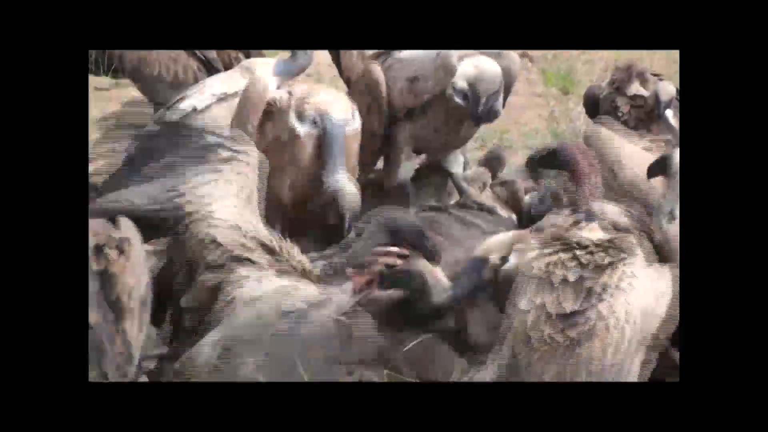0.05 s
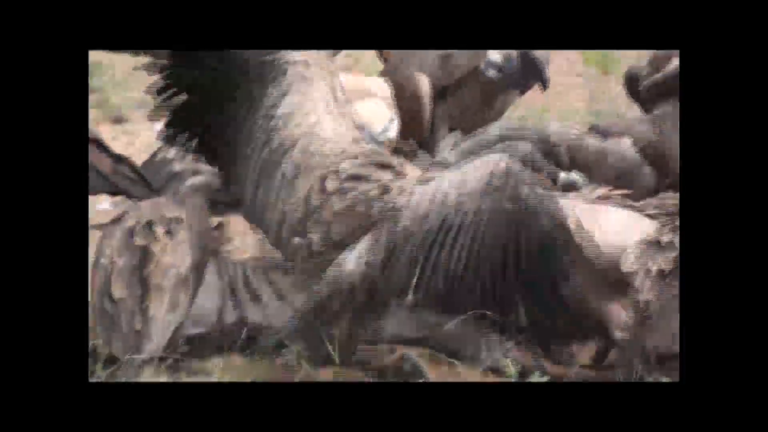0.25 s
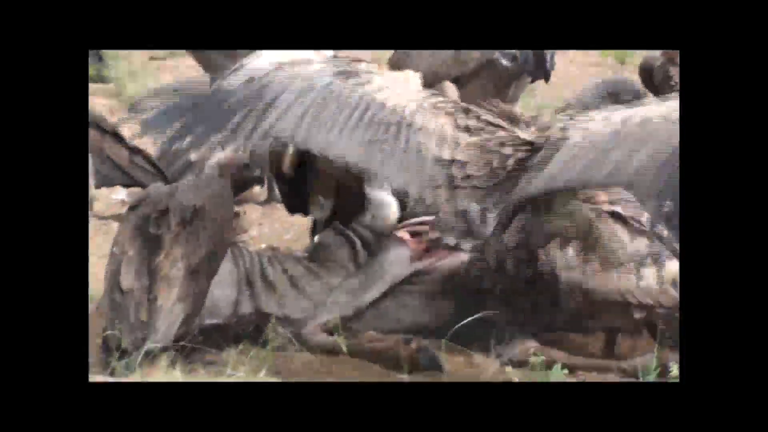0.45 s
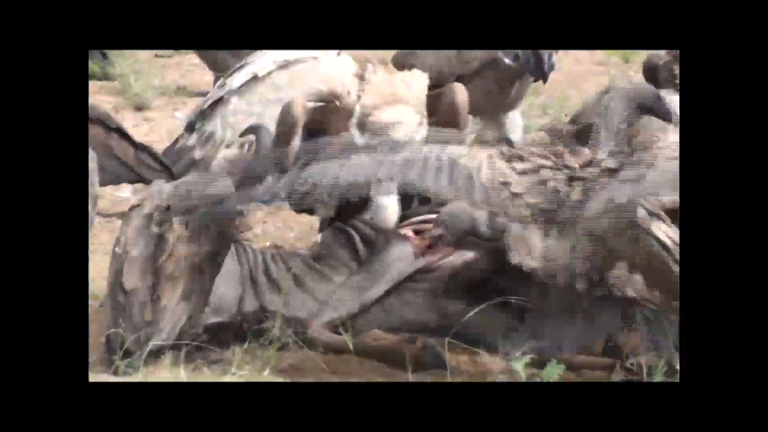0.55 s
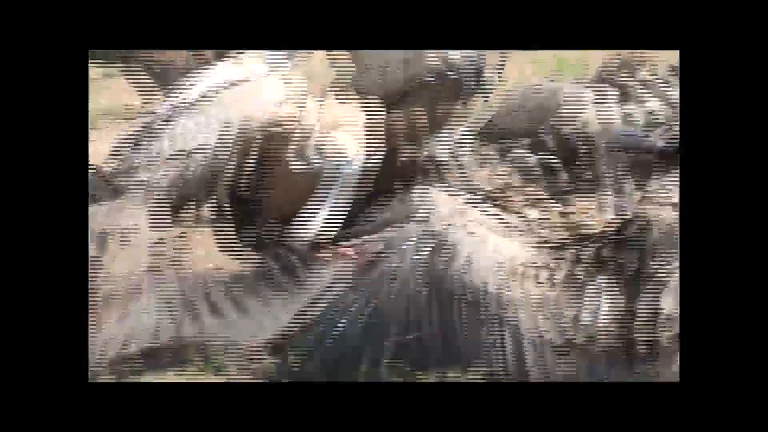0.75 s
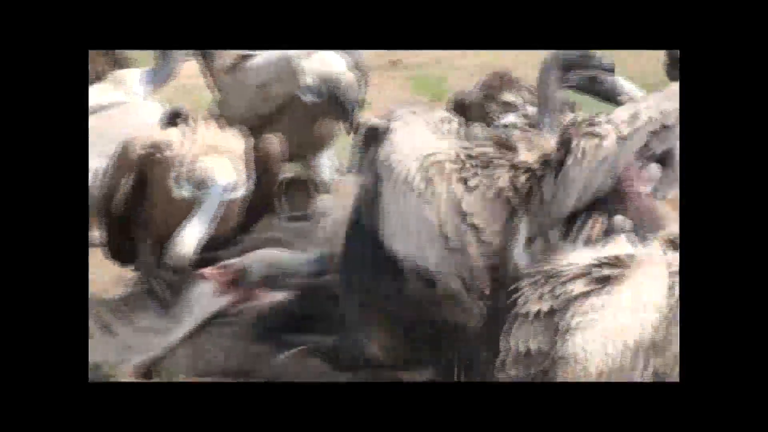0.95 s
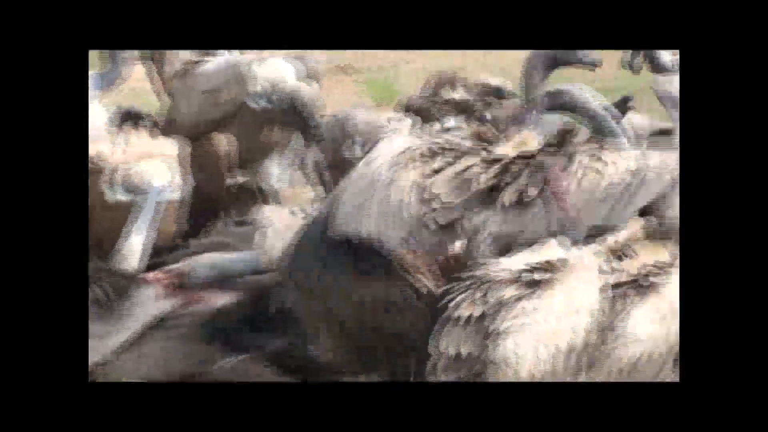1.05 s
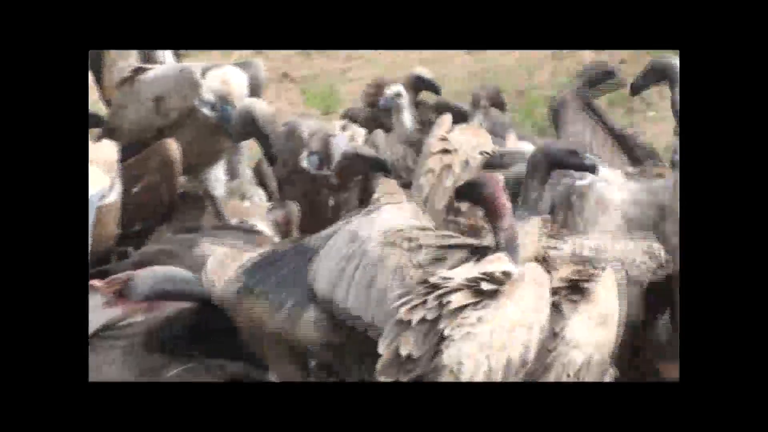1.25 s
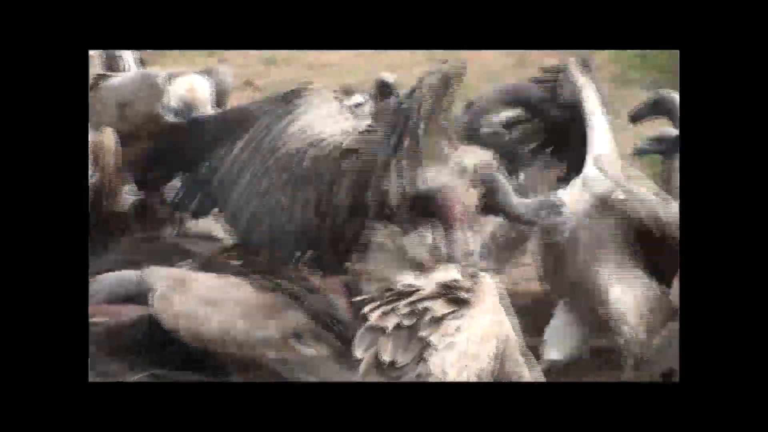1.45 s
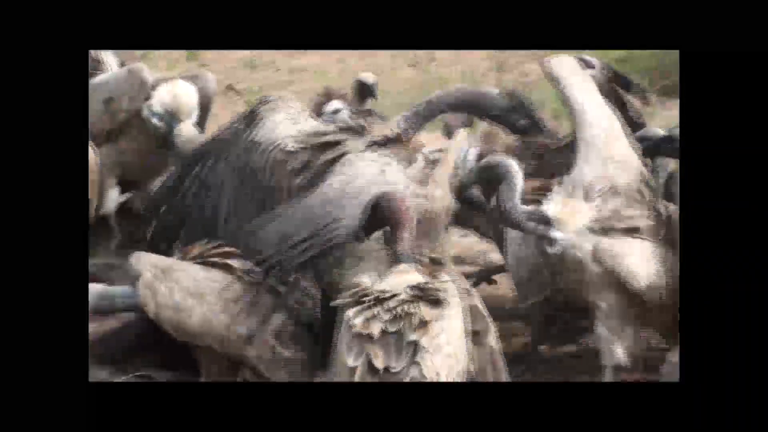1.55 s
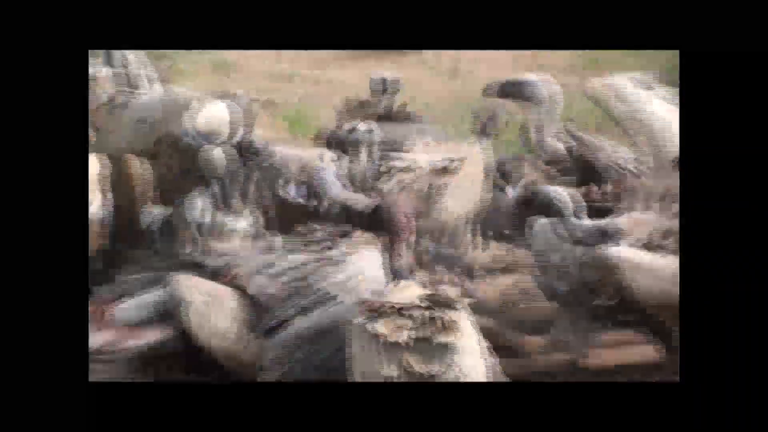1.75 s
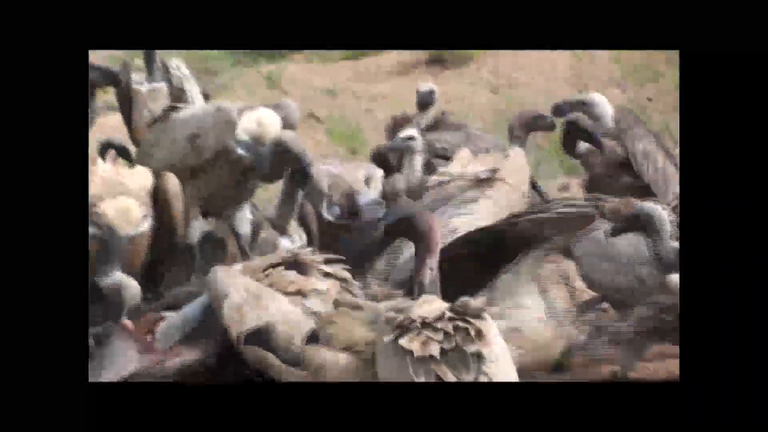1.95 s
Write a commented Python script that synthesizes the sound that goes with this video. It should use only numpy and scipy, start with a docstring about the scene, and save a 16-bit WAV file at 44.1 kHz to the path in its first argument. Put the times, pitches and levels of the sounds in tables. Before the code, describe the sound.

Hoarse, hissing vulture squabble: two longer rasps, then rapid short squealing rasps, with flock hiss behind

```python
"""Vultures squabble over a carcass on open dry ground, a few metres away.
A faint rasp and two long ones lead into a run of short ones: noise, chopped by irregular flutter,
rings three throat resonances beside a whistling squeal and a broad hiss.
Wings swish as dense click sprays, feet thump and scuff, quills and beaks snap as dying noise bursts.
Behind, coloured noise makes the hissing flock, the breeze, a low drone and puffs on the microphone."""
import sys
import numpy as np
from scipy import signal
from scipy.fft import rfft, irfft
from scipy.io import wavfile
from scipy.ndimage import uniform_filter1d, map_coordinates

SR = 44100
rng = np.random.default_rng(int(sys.argv[2]) if len(sys.argv) > 2 else 0)


def pcm_store(signal):
    """Save signal as 16-bit PCM."""
    levels = np.round(np.clip(np.atleast_2d(signal), -1, 1) * 32767)
    wavfile.write(sys.argv[1], SR, levels.astype(np.int16).T)


N = 88200
T = np.arange(N) / SR

# Every spectrum below is a relative density: f/Hz, level/dB per Hz.
# puffs of air on the microphone: start t/s, length/s, attack/s, release/s, level/dB
PUFFS = [(-0.03, 0.32, 0.017, 0.089, -48.5), (0.243, 0.285, 0.056, 0.013, -48.5),
         (0.575, 0.13, 0.025, 0.045, -61.5), (0.85, 0.25, 0.087, 0.1, -44.5),
         (1.091, 0.096, 0.012, 0.014, -52)]
# spectrum of the puffs: f/Hz, level/dB per Hz
PUFF_SPECTRUM = [(20, -12), (55, -4.5), (100, -7), (200, -10.5), (400, -38), (1000, -66)]
# faint low drone far away: t/s, level/dB
DRONE_LEVEL = [(0, -61.5), (.5, -61), (.6, -51.5), (.78, -55.5), (.88, -68), (1.05, -51), (1.15, -78),
               (2, -72)]
DRONE_HZ, DRONE_WIDTH_HZ = 249, 72
# spectrum of the steady breeze: f/Hz, level/dB per Hz
BREEZE_SPECTRUM = [(20, -16), (60, -6.5), (130, -6.5), (210, -5), (300, -8), (420, -4), (620, -9),
                   (1200, -13.5), (4000, -18.5), (15000, -23)]
BREEZE_DB = -52.5
# side-to-middle ratios of the stereo noises
PUFF_WIDTH, FLOCK_WIDTH, BREEZE_WIDTH = 0.85, 0.18, 0.3

# hissing of the flock behind: t/s, level/dB
FLOCK_LEVEL = [(0, -34.5), (.16, -38.5), (.21, -34), (.39, -33), (.46, -40), (.53, -29.5), (.72, -36.5),
               (.8, -36.5), (.89, -32.5), (.97, -31.5), (1.05, -36), (1.14, -38.5), (1.26, -43),
               (1.33, -33), (1.39, -40.5), (1.65, -42), (1.85, -41), (2, -40.5)]
# spectrum of that hissing: f/Hz, level/dB per Hz
FLOCK_SPECTRUM = [(640, -20.5), (900, -6), (1350, 3), (1650, 5), (1900, 3.5), (2350, 7), (2900, 2.5),
                  (3500, -2.5), (4800, -3), (7000, -10), (10000, -14.5), (15000, -31.5)]
FLOCK_FLICKER_DB, FLOCK_FLICKER_HZ = 1.05, 26.3
# feathers and dry grass; level relative to the flock
CRACKLES_PER_S, CRACKLE_SPREAD_DB, CRACKLE_DB = 100, 6, -20.5

# rasping calls: start t/s, length/s, attack/s, release/s, level/dB, low resonance f/Hz, its level/dB,
# main resonance f/Hz, its width/Hz, upper resonance f/Hz, its level/dB, hiss level/dB, squeal level/dB,
# pitch fall/share; frequencies are before the pitch bend, inner levels relative to the main resonance
RASPS = [ (0.065, 0.13, 0.047, 0.02, -36.5, 1290, 3.5, 1650, 200, 2520, 3, 2, -25, 0),
         (0.245, 0.15, 0.028, 0.039, -21, 1490, -12.5, 2550, 566, 2690, -1, -2, -6, 0.031),
         (0.54, 0.17, 0.045, 0.0053, -20, 1760, -9.5, 2423, 308, 2650, -6, -3.5, 6.5, 0.019),
         (0.739, 0.0079, 0.003, 0.0064, -23.5, 1170, 1, 1680, 300, 2460, -14, -29, -10, 0.024),
         (0.750, 0.043, 0.0057, 0.019, -23.5, 1505, 5, 2137, 420, 2700, -2, -8.5, 2.5, .1),
         (0.822, 0.0562, 0.006, 0.03, -19, 1480, -4.5, 2400, 444, 2660, -0.5, -11, 0.5, .05),
         (0.901, 0.046, 0.0045, 0.038, -17, 1600, -3, 2335, 260, 3030, -3, 0, 9.5, 0.047),
         (0.984, 0.061, 0.0041, 0.026, -29, 1540, 2, 2208, 360, 2930, 0, -3.5, -4, .02),
         (1.079, 0.048, 0.0066, 0.037, -20.5, 1280, -17, 2296, 320, 2760, -4.5, -7, -3, 0.13),
         (1.176, 0.057, 0.012, 0.034, -26.5, 1280, -8, 2268, 358, 2730, -2.5, -2.5, 0, 0.036),
         (1.275, 0.089, 0.019, 0.034, -26.5, 1513, -1, 2780, 420, 2310, -0.5, 0, -2, 0.039), ]
# spectrum of the hiss in a call: f/Hz, level/dB per Hz
HISS_SPECTRUM = [(700, -12.5), (1100, -7), (2000, 5), (3100, 0), (3650, 0), (4400, 3), (5500, -1),
                 (7000, -9), (10000, -20), (15000, -31)]
LOW_WIDTH_HZ, UPPER_WIDTH_HZ, THROAT_CUT_HZ = 220, 556, 1105
# median rate of the air puffs, log spread of their spacing, decay of each, constant flow between them
FLUTTER_PER_S, FLUTTER_JITTER, FLUTTER_DECAY_S, STEADY_FLOW = 370, 0.44, 0.0011, 0.64
SQUEAL_JITTER_HZ, SQUEAL_JITTER_RATE_HZ, SQUEAL_SHIMMER_DB = 120.4, 409, 1.5
# the beak is widest just after the middle of a call
OPENING_SKEW, OPENING_PITCH_SHARE, OPENING_HISS_DB = 1.208, 0.045, 3
EVEN_S = 0.006  # breath pressure smooths the flow over this time
ONSET_SHARE = 0.37  # a call bursts out at this share of its full strength
WOBBLE_DB, WOBBLE_HZ = 0.7, 60  # unsteady effort

# wing swishes: start t/s, length/s, attack/s, release/s, level/dB
SWISHES = [(0.227, 0.051, 0.0088, 0.017, -25), (0.253, 0.1, 0.013, 0.074, -34),
           (0.355, 0.17, 0.016, 0.098, -41.5), (0.59, 0.12, 0.056, 0.064, -32),
           (0.926, 0.028, 0.011, 0.021, -34), (1.31, 0.052, 0.022, 0.01, -42.5)]
# spectrum of brushing feathers, also of the crackle: f/Hz, level/dB per Hz
SWISH_SPECTRUM = [(700, -24), (1500, -10), (2800, 3), (5000, 5.5), (9000, 0.5), (12500, -9.5), (15000, -38)]
BARBS_PER_S, BARB_SPREAD_DB = 7900, 4.5

# soft thumps of feet and wings: t/s, level/dB, f/Hz
THUMPS = [(0.775, -40, 256), (1.195, -49, 390), (1.762, -41, 165), (1.885, -45, 162), (1.935, -40, 206)]
THUMP_DECAY_S, THUMP_Q = 0.017, 3
# feet scuffing the dry ground: start t/s, length/s, attack/s, release/s, level/dB
SCUFFS = [(1.487, 0.089, 0.02, 0.044, -59), (1.812, 0.24, 0.06, 0.05, -54)]
SCUFF_HZ, SCUFF_WIDTH_HZ = 845, 310

# quill and beak snaps: t/s, level/dB, f/Hz
SNAPS = [(0.812, -38, 2200), (1.167, -36, 2400), (1.568, -29, 1900), (1.66, -46, 6000), (1.725, -46, 5000),
         (1.893, -41, 2200)]
# spectrum of the broad crack in a snap: f/Hz, level/dB per Hz
CRACK_SPECTRUM = [(900, -11), (2500, 8), (9000, 1), (15000, 1)]
SNAP_DECAY_S, SNAP_Q, SNAP_CRACK_DB = 0.0024, 2.2, 1  # crack level relative to the tick

# sound thrown back by bodies, ground and scrub
SCATTER_DB, SCATTER_T60_S, SCATTER_WIDTH = -6, 0.095, 0.32
BIRD_PAN_DB = 0.06  # left up, right down by this much
CUTOFF_HZ = 14900


def from_db(db):
    """Decibels to gain."""
    return 10 ** (np.asarray(db) / 20)


def rms_one(x):
    """Scale to unit power."""
    return x / np.sqrt(np.mean(x ** 2) + 1e-20)


def level(rows):
    """Gain along a curve of t/s, level/dB."""
    return from_db(np.interp(T, *np.transpose(rows)))


def colour(x, spectrum):
    """Give a signal a broad spectrum, rolled off below its first point; rms 1."""
    hz, db = np.transpose(spectrum)
    f = np.maximum(np.fft.rfftfreq(N, 1 / SR), 1)
    below = np.minimum(f / hz[0], 1) ** 2
    gain = from_db(np.interp(np.log(f), np.log(hz), db))
    return rms_one(irfft(rfft(x) * below * gain, N))


def resonate(x, hz, width_hz):
    """Ring a steep-sided resonance made of two equal sections; rms 1."""
    r = np.exp(-np.pi * width_hz * np.sqrt(2) / SR)
    section = [1 - r, 0, r - 1, 1, -2 * r * np.cos(2 * np.pi * hz / SR), r * r]
    return rms_one(signal.sosfilt([section, section], x))


def swell(start, length, attack, release):
    """Attack, hold, release."""
    rise = (T - start) / attack
    fall = (start + length - T) / release
    return np.clip(np.minimum(rise, fall), 0, 1)


def swells(rows):
    """Summed gain of all the swells in a table."""
    return sum(from_db(db) * swell(*shape) for *shape, db in rows)


def drift(rate_hz):
    """Random wander with spread 1, weakening above the given rate."""
    f = np.fft.rfftfreq(N, 1 / SR)
    return rms_one(irfft(rfft(rng.standard_normal(N)) / (1 + (f / rate_hz) ** 2), N))


def wide_noise(width):
    """Stereo noise with a given ratio of side to middle."""
    mid, side = rng.standard_normal((2, N))
    return mid + width * side * np.array([[1], [-1]])


def grains(per_s, spread_db):
    """Random clicks of uneven size and either sign."""
    hits = rng.random(N) < per_s / SR
    size = from_db(spread_db * np.minimum(rng.exponential(1, N), 4))
    return hits * size * rng.choice([-1, 1], N)


def burst(start, decay_s):
    """Instant onset, exponential decay."""
    return (T >= start) * np.exp(-np.abs(T - start) / decay_s)


def knocks(rows, decay_s, q):
    """Each contact is a dying noise burst around its own pitch."""
    out = np.zeros(N)
    for start, db, hz in rows:
        ring = resonate(rng.standard_normal(N), hz, hz / q)
        out += from_db(db) * burst(start, decay_s) * ring
    return out


def wind():
    """Moving air: a steady breeze and puffs on the microphone as coloured noise, with a far resonant drone."""
    puffs = swells(PUFFS) * colour(wide_noise(PUFF_WIDTH), PUFF_SPECTRUM)
    drone = level(DRONE_LEVEL) * resonate(rng.standard_normal(N), DRONE_HZ, DRONE_WIDTH_HZ)
    breeze = from_db(BREEZE_DB) * colour(wide_noise(BREEZE_WIDTH), BREEZE_SPECTRUM)
    return puffs + drone + breeze


def flock():
    """The other birds hiss with a flicker; crackling clicks of feathers and grass share their level curve."""
    flicker = from_db(FLOCK_FLICKER_DB * drift(FLOCK_FLICKER_HZ))
    hiss = colour(wide_noise(FLOCK_WIDTH), FLOCK_SPECTRUM) * flicker
    crackle = from_db(CRACKLE_DB) * colour(grains(CRACKLES_PER_S, CRACKLE_SPREAD_DB), SWISH_SPECTRUM)
    return level(FLOCK_LEVEL) * (hiss + crackle)


def flutter():
    """Gain of the breath: irregular puffs, each dying away, over a constant flow."""
    gaps = np.exp(FLUTTER_JITTER * rng.standard_normal(N // 20)) / FLUTTER_PER_S
    starts = np.cumsum(gaps)
    starts -= starts[0]
    latest = np.searchsorted(starts, T, side="right") - 1
    return STEADY_FLOW + np.exp(-(T - starts[latest]) / FLUTTER_DECAY_S)


def squeal(hz):
    """A membrane whistles at the throat's main resonance, shaken in pitch and level by turbulence; rms 1."""
    pitch = hz + SQUEAL_JITTER_HZ * drift(SQUEAL_JITTER_RATE_HZ)
    shimmer = from_db(SQUEAL_SHIMMER_DB * drift(SQUEAL_JITTER_RATE_HZ))
    return rms_one(np.sin(2 * np.pi * np.cumsum(pitch) / SR) * shimmer)


def effort(start, length, attack, release):
    """A call bursts out, swells, wobbles and dies away."""
    rise = np.clip(ONSET_SHARE + (1 - ONSET_SHARE) * (T - start) / attack, 0, 1) * (T >= start)
    fall = np.clip((start + length - T) / release, 0, 1)
    return rise * fall * from_db(WOBBLE_DB * drift(WOBBLE_HZ))


def rasps():
    """Fluttering breath rings three throat resonances; pitch and hiss rise and sink with the beak."""
    out = np.zeros(N)
    throat_cut = signal.butter(3, THROAT_CUT_HZ, "high", fs=SR, output="sos")
    for (start, length, attack, release, db, low_hz, low_db, main_hz, width_hz,
         upper_hz, upper_db, hiss_db, squeal_db, fall) in RASPS:
        air = rng.standard_normal((4, N)) * flutter()
        progress = np.clip((T - start) / length, 0, 1)
        opening = np.sin(np.pi * progress ** OPENING_SKEW) - 2 / np.pi

        throat = resonate(air[0], main_hz, width_hz)
        throat += from_db(low_db) * resonate(air[1], low_hz, LOW_WIDTH_HZ)
        throat += from_db(upper_db) * resonate(air[2], upper_hz, UPPER_WIDTH_HZ)
        throat += from_db(squeal_db) * squeal(main_hz)
        # bend the pitch by reading the throat sound at a varying speed
        speed = 1 + OPENING_PITCH_SHARE * opening - fall * (progress - 0.5)
        throat = map_coordinates(throat, [np.cumsum(speed)], order=3, mode="wrap")
        throat = signal.sosfilt(throat_cut, throat)

        hiss = from_db(hiss_db + OPENING_HISS_DB * opening) * colour(air[3], HISS_SPECTRUM)
        call = throat + hiss
        call = call / np.sqrt(uniform_filter1d(call ** 2, int(EVEN_S * SR)) + 1e-9)
        out += from_db(db) * effort(start, length, attack, release) * call
    return out


def wings():
    """Stiff feathers brush past each other in a dense spray of tiny clicks."""
    return swells(SWISHES) * colour(grains(BARBS_PER_S, BARB_SPREAD_DB), SWISH_SPECTRUM)


def feet():
    """Soft low thumps of feet and wings, and feet dragged through dust as resonant noise."""
    dust = resonate(rng.standard_normal(N), SCUFF_HZ, SCUFF_WIDTH_HZ)
    return knocks(THUMPS, THUMP_DECAY_S, THUMP_Q) + swells(SCUFFS) * dust


def snaps():
    """Quills and beaks snap: a pitched tick with a broad crack, both dying at the same rate."""
    crack = sum(from_db(db + SNAP_CRACK_DB) * burst(start, SNAP_DECAY_S) for start, db, _ in SNAPS)
    ticks = knocks(SNAPS, SNAP_DECAY_S, SNAP_Q)
    return ticks + crack * colour(rng.standard_normal(N), CRACK_SPECTRUM)


def scatter(x):
    """Bodies, ground and scrub throw back a short tail of decaying stereo noise."""
    tail = wide_noise(SCATTER_WIDTH) * from_db(-60 * T / SCATTER_T60_S)
    tail = tail / np.sqrt(np.sum(tail ** 2, axis=1, keepdims=True))
    return from_db(SCATTER_DB) * signal.fftconvolve(x[None], tail, axes=1)[:, :N]


def scene():
    """The near birds, almost straight ahead, with flock and wind around them."""
    near = rasps() + wings() + feet() + snaps()
    panned = near * from_db([[BIRD_PAN_DB], [-BIRD_PAN_DB]])
    return panned + scatter(near) + flock() + wind()


def record(dry):
    """The top is cut steeply."""
    return signal.sosfilt(signal.ellip(10, 0.1, 90, CUTOFF_HZ, fs=SR, output="sos"), dry)


dry = scene()
out = record(dry)
pcm_store(out)
```